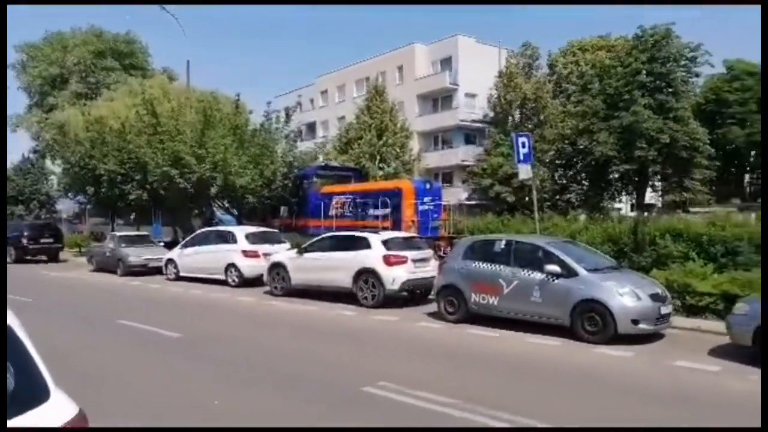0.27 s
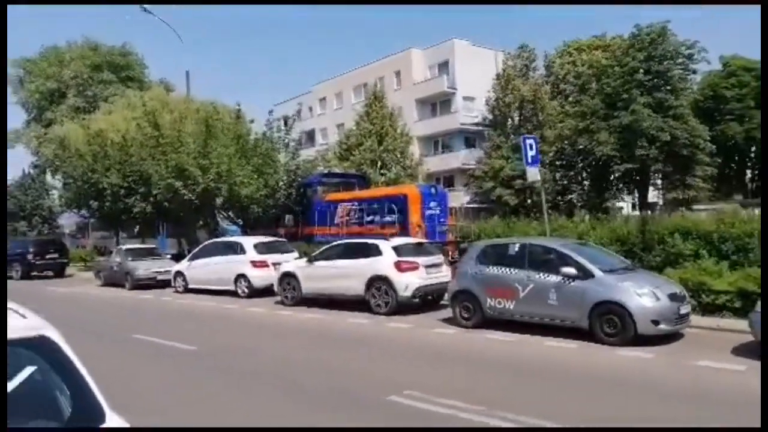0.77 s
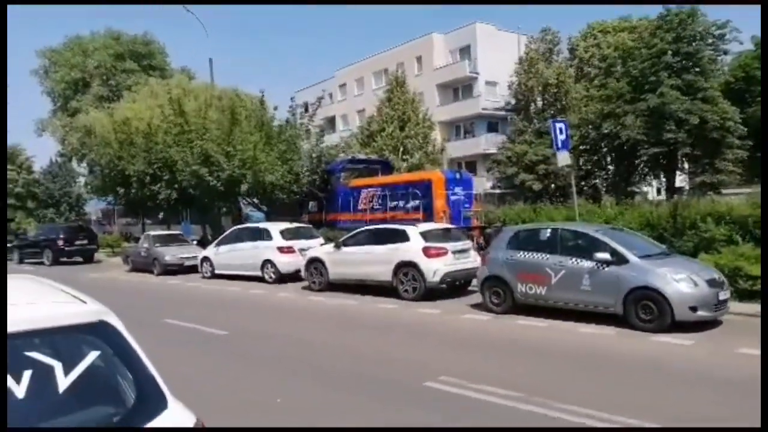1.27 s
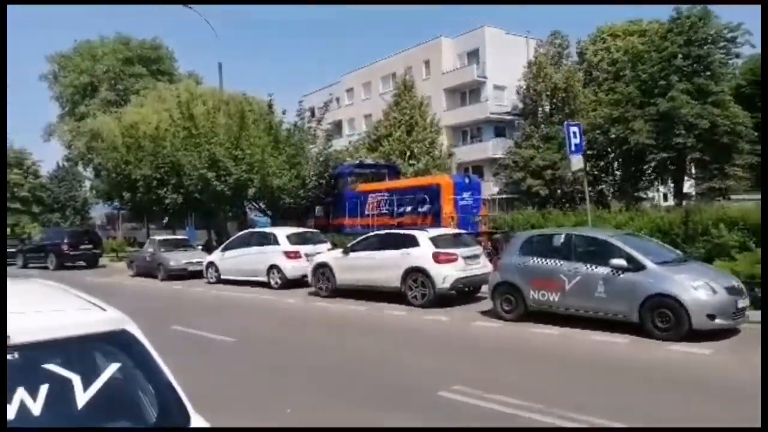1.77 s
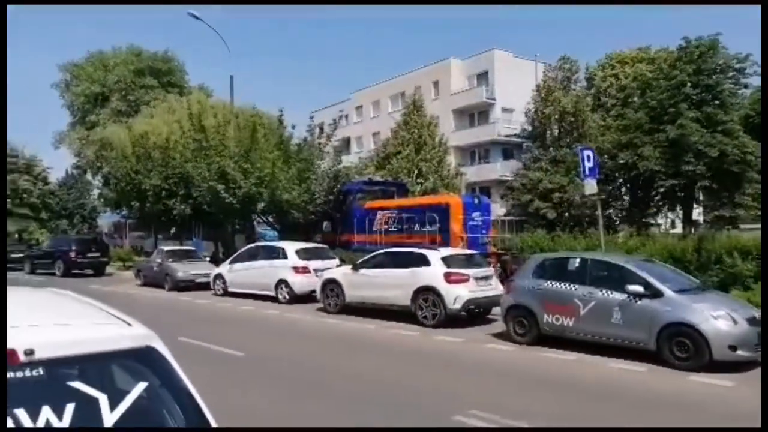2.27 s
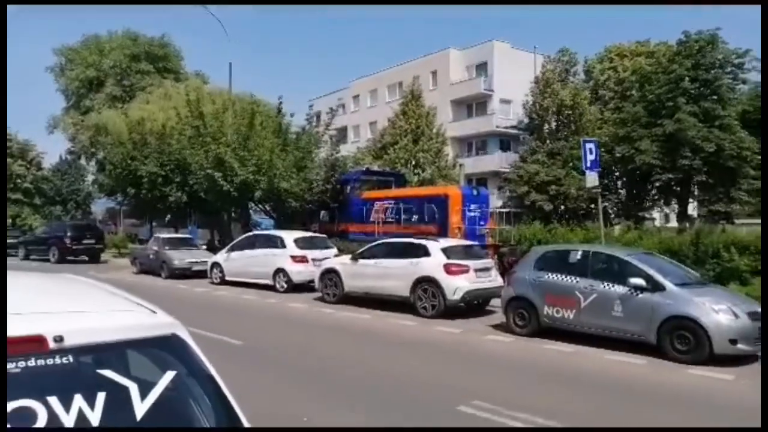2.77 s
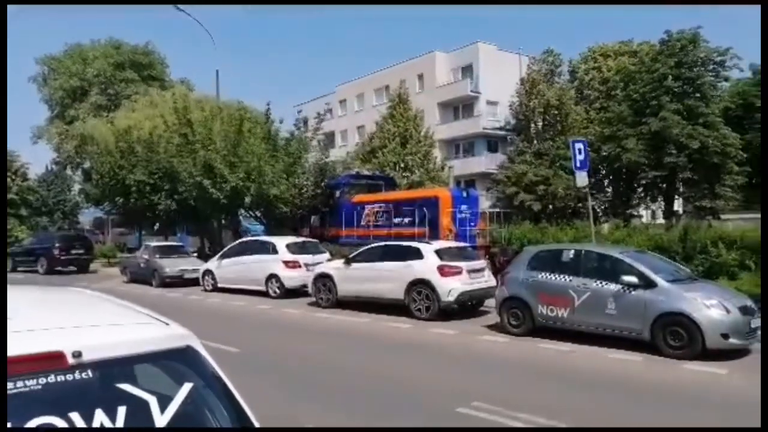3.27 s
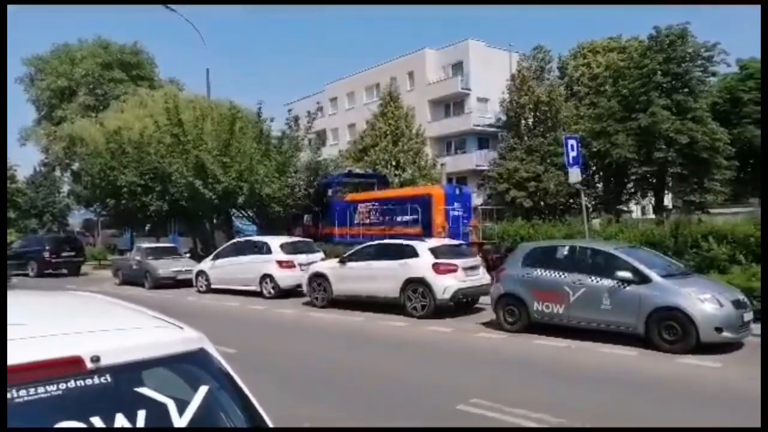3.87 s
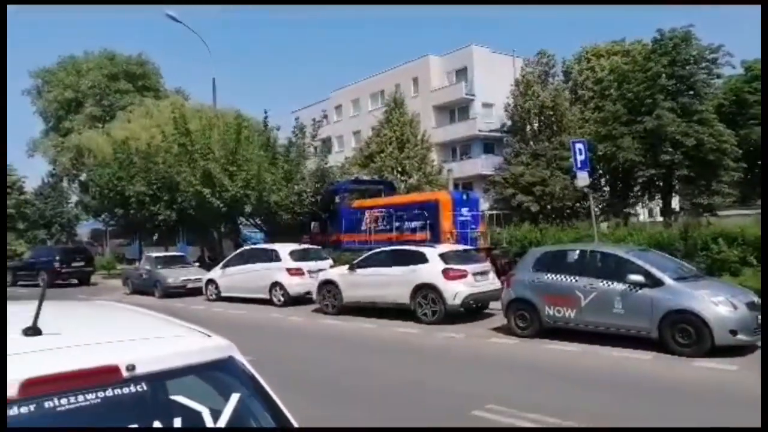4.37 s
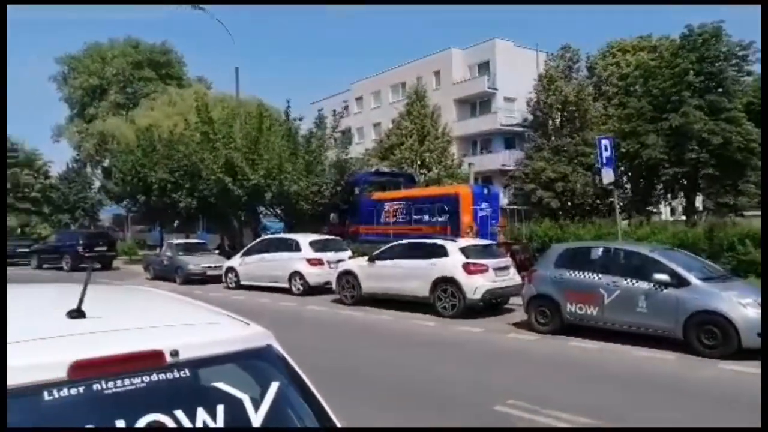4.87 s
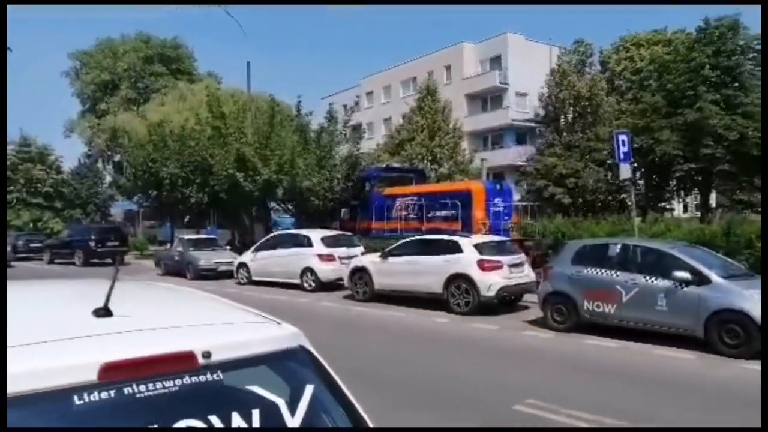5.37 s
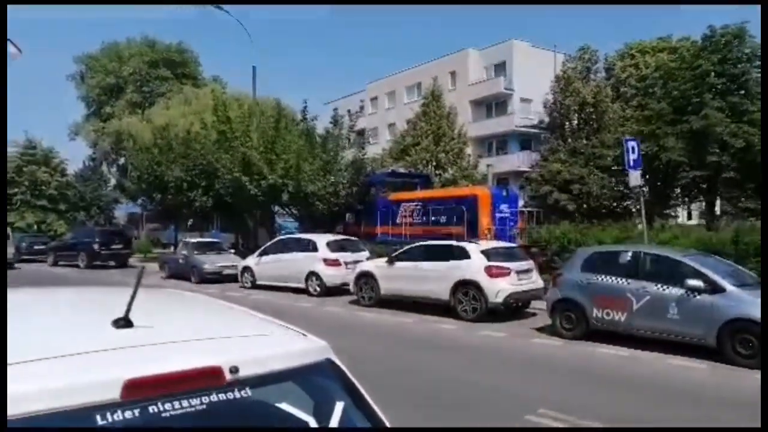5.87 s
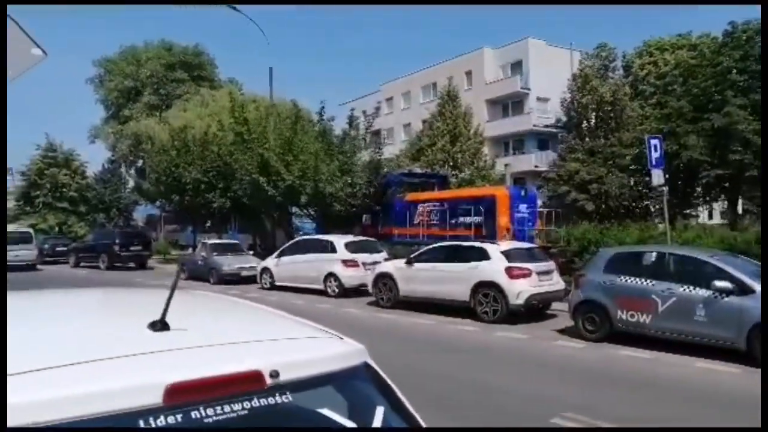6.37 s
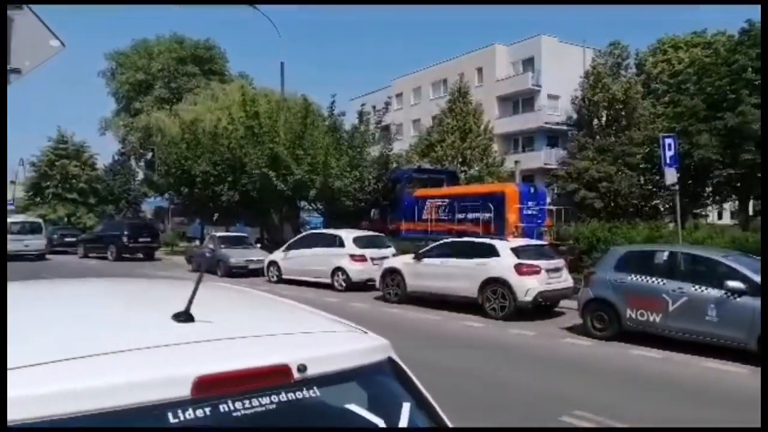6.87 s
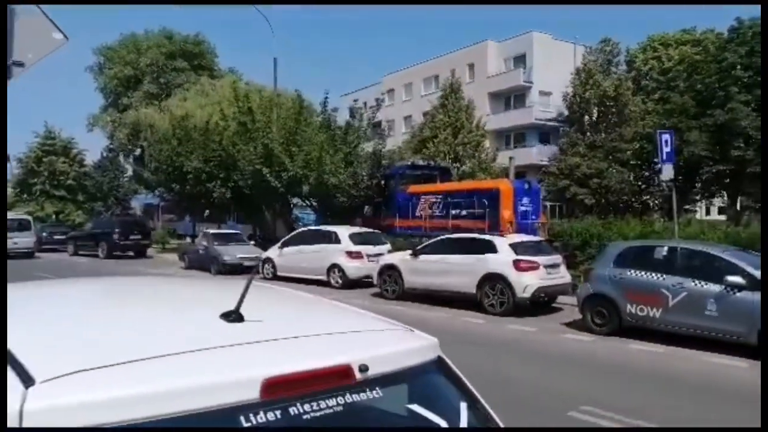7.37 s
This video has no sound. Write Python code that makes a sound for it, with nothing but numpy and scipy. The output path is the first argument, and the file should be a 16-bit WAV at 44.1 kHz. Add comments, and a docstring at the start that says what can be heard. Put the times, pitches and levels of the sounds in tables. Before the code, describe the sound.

A diesel locomotive idles softly across a street, gives one loud brassy horn blast with street echo, then its engine throbs harder.

```python
"""Locomotive idle and horn blast

A diesel locomotive idles behind parked cars, sounds one long blast of its air horn, then takes load.
Engine: additive synthesis of its cycle harmonics, with shaped noise for rumble, roar, hiss and blower.
Horn: harmonic partials driven by air pressure. Interference with reflections from cars and house
fronts makes each overtone swell and fade on its own at each of two microphone ports.
A few faint dry ticks are decaying noise. The phone compresses the level under the blast.
"""
import sys
import numpy as np
from scipy import signal
from scipy.fft import rfft, irfft, next_fast_len
from scipy.io import wavfile
from scipy.ndimage import uniform_filter1d, map_coordinates

SR = 44100
rng = np.random.default_rng(int(sys.argv[2]) if len(sys.argv) > 2 else 0)


def master_out(mix):
    """Clip the mix to full scale and print it as 16-bit PCM to the path in sys.argv[1]."""
    frames = np.transpose(np.atleast_2d(mix))
    ceiling = np.clip(frames, -1, 1)
    pcm = np.round(ceiling * 32767).astype(np.int16)
    wavfile.write(sys.argv[1], SR, pcm)


N = 336483


def amp(db):
    """Decibel law: level in dB to amplitude gain."""
    return 10 ** (np.asarray(db) / 20)


def unit(x):
    """Normalisation to an rms of 1."""
    return x / np.sqrt(np.mean(x ** 2) + 1e-20)


def along(points, hz):
    """Interpolation of (Hz, value) points on a logarithmic frequency axis."""
    point_hz, values = np.transpose(points)
    return np.interp(np.log(hz + 1), np.log(point_hz + 1), values)


def curves(rows):
    """Envelopes: one value per sample for each column after the time."""
    seconds, *columns = np.transpose(rows)
    return [np.interp(np.arange(N) / SR, seconds, column) for column in columns]


def wobble(rate, size=N):
    """Random modulation: normal values, rate of them a second, joined by straight lines."""
    knots = rng.standard_normal(int(size * rate / SR) + 4)
    return map_coordinates(knots, [np.arange(size) * rate / SR], order=1)


def filtered(x, response):
    """Linear filtering: the spectrum times a response of frequency."""
    size = next_fast_len(N + SR // 2)
    return irfft(rfft(x, size) * response(np.fft.rfftfreq(size, 1 / SR)), size)[..., :N]


# Coherence of noise at the two ports. Each row: frequency in Hz, left-right correlation.
LIKENESS = [(60, 0.91), (180, 0.87), (540, 0.58), (1610, 0.4), (4820, 0.19), (14400, 0.15)]


def rush(level_db, patchy_db):
    """Turbulence: stereo noise of rms 1 with random patches in time and frequency, shaped by level_db(hz)."""
    spectra = signal.stft(rng.standard_normal((2, N)), nperseg=512)[2]
    across_hz = uniform_filter1d(rng.standard_normal(spectra.shape[1:]), 6, 0)
    patches = unit(uniform_filter1d(across_hz, 14, 1))
    pair = signal.istft(spectra * amp(patchy_db * patches), nperseg=512)[1][:, :N]

    def mid_side(hz):
        # half the angle whose cosine is the correlation splits the power into mid and side
        angle = np.arccos(np.clip(along(LIKENESS, hz), -1, 1)) / 2
        return amp(level_db(hz)) * [np.cos(angle), np.sin(angle)]

    mid, side = filtered(pair, mid_side)
    return unit(np.array([mid + side, mid - side]))


# Harmonics of the engine cycle. Each row: multiple of the cycle rate, rms level in dB before the
# unsteadiness and left-right swing; moving levels replace those of orders 8 and 16.
ORDERS = [(2, -82), (3, -76.5), (4, -63), (6, -64.5), (7, -55), (8, -51), (10, -59), (13, -60.5), (14, -79),
          (16, -43), (19, -58), (20, -56), (24, -58.5), (30, -56.5), (32, -64.5), (33, -62), (34, -52),
          (35, -83.5), (36, -73), (41, -56), (52, -70), (56, -69), (58, -64), (60, -65), (61, -71.5),
          (68, -72), (72, -61), (79, -62.5), (80, -72.5), (84, -68), (86, -62.5), (96, -67.5)]


def exhaust(eighth_db, sixteenth_db):
    """Periodic firing gives a harmonic series; orders 8 and 16 follow level curves of their own."""
    cycle_hz = 8.724
    turn = 2 * np.pi * cycle_hz * np.cumsum(1 + 0.0012 * wobble(2.007)) / SR
    lines = np.zeros(N)
    for order, db in ORDERS:
        db = {8: eighth_db, 16: sixteenth_db}.get(order, db)
        wave = np.sqrt(2) * np.sin(order * turn + rng.uniform(0, 2 * np.pi))
        lines += amp(db + 1.2 * wobble(7)) * wave
    return lines, turn


# Moving levels of the engine. Each row: time in seconds, strength of rumble and roar from 0 to 1,
# 8th order in dB rms and 16th order in dB rms before unsteadiness and swing, bass left minus right in dB.
ENGINE_LEVELS = [(0, 0, -46, -46, 1), (.4, 0.12, -49, -46, 2.5), (1.1, 0.04, -61, -42, 3.5),
                 (1.9, 0.02, -48, -40, 2.5), (2.5, 0.04, -50, -41.5, 1.5), (3.9, 0.09, -49, -44.5, 1.5),
                 (4.75, 0.01, -59, -45.5, 1.5), (5, 0.83, -53, -40, -3.5), (5.3, 0.1, -60, -42.5, 0),
                 (5.9, 1, -55, -44, -3), (6.45, 0.6, -54.5, -49, -1.5), (6.75, 0.55, -50, -41.5, -4),
                 (7.1, 0.54, -37, -44, -2.5), (7.45, 0.68, -34.5, -37, -3), (7.63, 0.5, -40, -46, -2)]
# Level of the hiss. Each row: time in seconds, level in dB before its wobble and lean.
HISS_LEVEL = [(0, -64), (.5, -65.5), (1.1, -66.5), (1.9, -69), (3, -66.5), (4.3, -66), (5.9, -71.5),
              (6.45, -60), (6.85, -66), (7.63, -63.5)]
# Noise spectra. Each row: frequency in Hz, relative spectral level in dB per Hz.
RUMBLE_SPECTRUM = [(15, -39.5), (25, -16.5), (55, -11.5), (100, -9), (165, -8.5), (235, -18), (330, -24.5),
                   (500, -56), (900, -120)]
ROAR_SPECTRUM = [(60, -120), (150, -46.5), (260, -22.5), (400, -28), (700, -26), (1150, -30), (1600, -29.5),
                 (2600, -31.5), (3200, -38.5), (4400, -40.5), (5500, -39.5), (6500, -46), (7500, -70.5),
                 (9500, -120)]
HISS_SPECTRUM = [(3000, -120), (5500, -30.5), (6800, -7), (7620, -6), (8600, -8.5), (9450, -4.5),
                 (10800, -17), (11600, -17.5), (12300, -21.5), (13500, -23.5), (14900, -39)]
BLOWER_SPECTRUM = [(900, -82), (1500, -10), (1800, -4), (2200, -12), (2600, -2), (3200, -5), (3860, 6),
                   (4600, -23), (6000, -80)]
# Resonances of the engine hood. Each row: centre in Hz, width in Hz, boost in dB.
HOOD_RESONANCES = [(1947, 650, 4.5), (3805, 250, 10), (5870, 200, 5)]
# Balance of roar, hiss and blower. Each row: frequency in Hz, left minus right in dB.
NOISE_LEAN = [(60, -5), (180, 8), (540, -0.5), (1610, -1.5), (4820, -2), (14400, -2)]


def engine():
    """Source and resonator: firing harmonics and rumble, a throbbing roar in the hood, hiss and blower."""
    strength, eighth_db, sixteenth_db, swing_db = curves(ENGINE_LEVELS)
    hiss_db, = curves(HISS_LEVEL)
    rumble_db = np.interp(strength, [0, 1], [-44.5, -34])  # from weakest to strongest
    roar_db = np.interp(strength, [0, 1], [-44, -37])
    halves = np.array([[.5], [-.5]])  # shares a level difference between left and right

    lines, turn = exhaust(eighth_db, sixteenth_db)
    rumble = amp(rumble_db) * rush(lambda hz: along(RUMBLE_SPECTRUM, hz), patchy_db=0.7)
    bass = (lines + rumble) * amp(swing_db * halves)  # the bass swings between left and right

    def roar_level(hz):
        hood_db = sum(db / (1 + (2 * (hz - centre) / width) ** 2) for centre, width, db in HOOD_RESONANCES)
        return along(ROAR_SPECTRUM, hz) + hood_db

    throb = 1 + .03 * (np.sin(24 * turn) + np.sin(2 * turn))
    roar = amp(roar_db) * throb * rush(roar_level, patchy_db=1.0)
    hiss = amp(hiss_db + wobble(7)) * rush(lambda hz: along(HISS_SPECTRUM, hz), patchy_db=1.6)

    load = np.clip((eighth_db + 46.5) / 7, 0, 1)  # a strong 8th order means fuel is being fed
    blower_gain = load * amp(-49.5 + 1.7 * wobble(3.7))
    blower = blower_gain * rush(lambda hz: along(BLOWER_SPECTRUM, hz), patchy_db=4.5)

    noises = filtered(roar + hiss + blower, lambda hz: amp(along(NOISE_LEAN, hz) * halves))
    left, right = bass + noises
    return np.array([np.roll(left, 2), right])  # the right port is a little nearer


# Ticks. Each row: start in seconds, initial noise level in dB before the filter.
TICK_TIMES = [(.05, -50), (.23, -46), (2.69, -37), (2.695, -41), (3.18, -47)]


def ticks():
    """Impulsive excitation: noise that decays exponentially, 60 dB in 3.5 ms, coloured by a filter."""
    x, t = np.zeros(N), np.arange(200) / SR
    for start, db in TICK_TIMES:
        x[round(start * SR):][:len(t)] += amp(db - 60 * t / 0.0035) * rng.standard_normal(len(t))
    colour = [(1500, -40), (3500, 7), (9000, -6), (11500, -8), (13000, -50)]  # Hz, dB
    return filtered(x, lambda hz: amp(along(colour, hz)))


# The direct path, then cars and house fronts. Each row: delay in ms, lead of the left port in ms,
# left level in dB, right level in dB, both before the treble loss of the reflections.
SOUND_PATHS = [(0.0, 0.128, -0.5, 0.6), (4.501, -0.53, -16.1, -32.1), (7.463, 0.584, -5.3, -0.0),
               (14.606, 0.599, -16.8, -13.1), (26.124, -0.595, -16.2, -27.2),
               (30.199, -0.512, -12.8, -25.8), (32.031, 0.552, -12.7, -8.0), (36.87, -0.405, -16.7, -24.4),
               (47.299, 0.6, -16.6, -15.9), (49.32, 0.025, -14.7, -26.5), (49.791, -0.44, -10.5, -12.8),
               (57.226, 0.331, -14.1, -18.5), (61.17, 0.463, -13.9, -8.9), (75.747, 0.452, -22.1, -15.9),
               (116.559, -0.595, -30.1, -13.2), (152.988, -0.32, -19.3, -19.1),
               (221.257, 0.575, -32.9, -22.0), (255.89, 0.186, -21.7, -21.2),
               (265.424, 0.086, -21.7, -23.2), (307.999, 0.6, -35.5, -22.2)]


def paths(hz):
    """Superposition of delayed paths: gliding partials pass through the interference at each port."""
    # reflections lose treble above the fundamental, at 3.9 dB per octave
    loss = amp(-3.9 * np.log2(np.maximum(hz, 1) / 355))
    side = np.array([[-.5], [.5]])
    total = 0
    for delay_ms, lead_ms, left_db, right_db in SOUND_PATHS:
        gain = amp([[left_db], [right_db]]) * (loss if delay_ms else 1)
        total = total + gain * np.exp(-2j * np.pi * hz * (delay_ms + side * lead_ms) / 1000)
    return total


# Reverberation of the street. Each row: frequency in Hz, time in seconds to decay by 60 dB.
STREET_DECAY = [(300, 0.93), (2000, 1.39), (6000, 0.82), (14000, 0.26)]


def street(x):
    """Diffuse reverberation: decaying noise as impulse response, drawn apart for each port."""
    hz, t, spectra = signal.stft(rng.standard_normal((2, SR)), SR, nperseg=256)
    decay = amp(-60 * t / along(STREET_DECAY, hz)[:, None])
    tail = signal.istft(spectra * decay, SR, nperseg=256)[1]
    delayed = np.pad(x, (1500, 0))[None]  # samples
    return signal.fftconvolve(delayed, tail / np.linalg.norm(tail[0]), axes=1)[:, :N]


# Fundamental of the horn, sharp at the start and sagging as the valve shuts.
# Each row: time in seconds, frequency in Hz.
HORN_PITCH = [(4.85, 373.289), (4.9, 363.606), (4.99, 352.95), (5.065, 349.272), (5.14, 348.511),
              (5.44, 350.141), (5.59, 353.295), (5.89, 359.0), (6.19, 362.527), (6.34, 363.997),
              (6.49, 364.031), (6.6, 362.81), (6.7, 360.21), (6.88, 342.1), (6.95, 339.998)]
# Air pressure at the horn. Each row: time in seconds, relative pressure in dB.
HORN_PRESSURE = [(4.853, -70), (4.872, -31), (4.9, -15), (4.94, -4), (5, 3.2), (5.6, 0), (5.9, -4.1),
                 (6.15, -2.4), (6.3, -10), (6.5, -18.3), (6.72, -29), (6.85, -41), (6.93, -70)]
# Partials 1 to 4, in order. Each row: level in dB at 0 dB of pressure before the paths,
# dB of level per dB of pressure, flutter depth in dB, gain in dB of the part scattered by rough fronts.
LOW_PARTIALS = [(-6, 0.69, 0.5, -34.5), (-2.5, 0.73, 1.5, -25.5), (-11, 0.83, 3, -7),
                (-14.5, 1.1, 2.5, -9.5)]
# Common level of the upper partials. Each row: time in seconds, relative level in dB.
UPPER_LEVEL = [(4.85, -75), (4.9, -38.5), (4.94, -26), (4.99, -19), (5.7, -20.5), (6.1, -27.5),
               (6.3, -41.5), (6.45, -50.5), (6.7, -62), (6.95, -66), (7.17, -72)]
# Radiation of the bell for the upper partials. Each row: frequency in Hz, relative level in dB.
BELL_RESPONSE = [(1780, -1.5), (2130, -1), (2470, -5.5), (2820, -10), (3170, -15), (3520, -9.5),
                 (3870, -7.5), (4250, -15.5), (5200, -12.5), (6000, -16), (7100, -21.5), (9500, -25),
                 (11500, -37.5), (14900, -53)]
# Spectrum of the air noise. Each row: frequency in Hz, relative spectral level in dB per Hz.
AIR_SPECTRUM = [(150, -51), (350, -4.5), (750, -6), (1500, -11.5), (3000, -18), (6000, -35), (10000, -33.5),
                (14000, -76)]


def horn():
    """Diaphragm oscillator and bell: chopped air gives harmonics, and a weaker blast is duller."""
    a, b = round(HORN_PRESSURE[0][0] * SR), round(UPPER_LEVEL[-1][0] * SR)
    envelopes = curves(HORN_PITCH) + curves(HORN_PRESSURE) + curves(UPPER_LEVEL)
    pitch, pressure_db, upper_db = [curve[a:b] for curve in envelopes]
    steady_phase = 2 * np.pi * np.cumsum(pitch) / SR
    jitter = pitch * 0.0015 * wobble(40.3, size=b - a)  # slightly unsteady edge of the wave
    unsteady_phase = steady_phase + 2 * np.pi * np.cumsum(jitter) / SR

    scattered, near = np.zeros(N), np.zeros((2, N))
    for k, (db, growth, flutter_db, scatter_db) in enumerate(LOW_PARTIALS, start=1):
        tone = np.zeros(N)
        tone[a:b] = amp(db + growth * pressure_db) * np.sin(k * steady_phase)
        flutter = np.array([wobble(26), wobble(16)])  # random for each partial, separate at each port
        near += filtered(tone, paths) * amp(flutter_db * flutter)
        scattered += amp(scatter_db) * tone

    slack_db = upper_db - upper_db.max()
    upper = np.zeros(N)
    for k in range(5, 43):
        dull_db = .5 * slack_db * np.log2(k / 5)  # the highest partials die first
        flutter_db = 4.7 * wobble(18.34, size=b - a)  # moving air on the way
        level_db = upper_db + along(BELL_RESPONSE, k * pitch) + dull_db + flutter_db
        upper[a:b] += amp(level_db) * np.sin(k * unsteady_phase + rng.uniform(0, 2 * np.pi))
    direct = amp(-4.0) * np.array([np.roll(upper, 1), upper])
    bright = (direct + amp(-1.0) * street(upper)) * amp([[-1.5], [1.5]])  # treble favours the right port

    air = np.zeros(N)
    air[a:b] = amp(-34 + 0.28 * slack_db)  # air that rushes past the diaphragm
    air_noise = air * rush(lambda hz: along(AIR_SPECTRUM, hz), patchy_db=0.5)
    return near + street(scattered) + bright + air_noise


def scene():
    """Superposition of engine, ticks and horn at the two ports."""
    return engine() + ticks() + horn()


def record(dry):
    """Compression takes back a share of the level above a knee; a low-pass sets the band limit."""
    power = uniform_filter1d(np.mean(dry ** 2, 0), 4000)  # averaged over samples
    level_db = 10 * np.log10(np.abs(power) + 1e-12)
    knee_db, share, top_hz = -26, .4, 15050
    gained = dry * amp(-share * np.maximum(level_db - knee_db, 0))
    return filtered(gained, lambda hz: hz < top_hz)


dry = scene()
out = record(dry)
master_out(out)
```